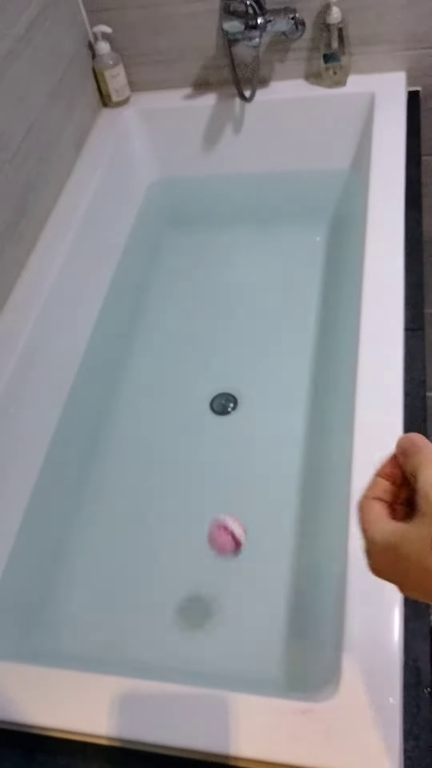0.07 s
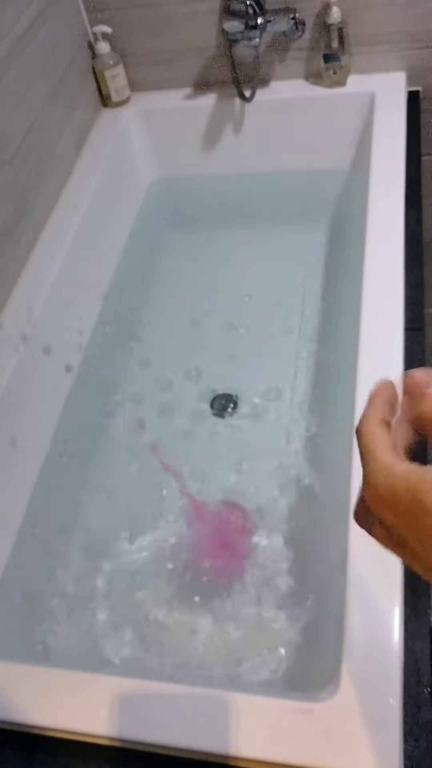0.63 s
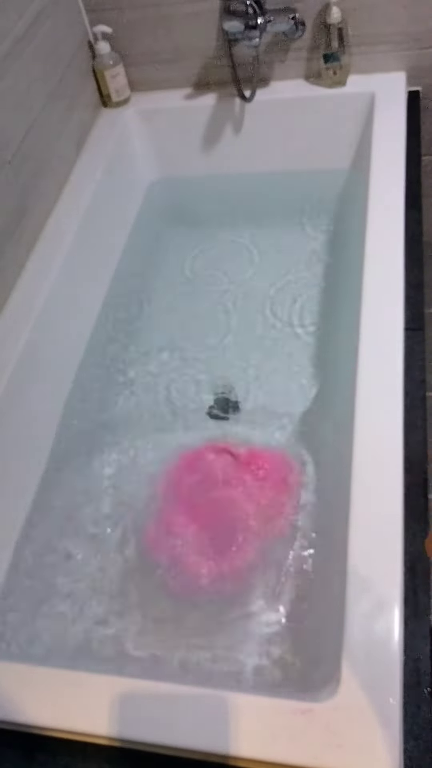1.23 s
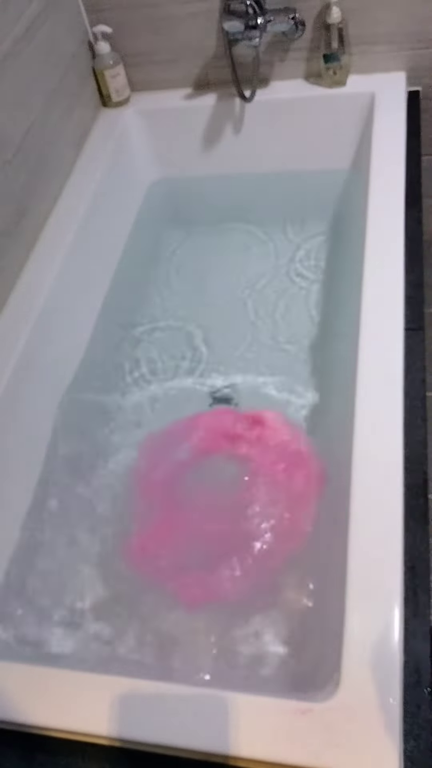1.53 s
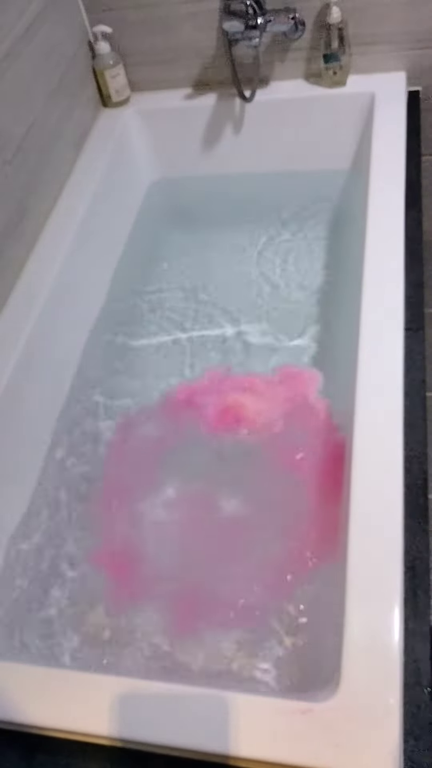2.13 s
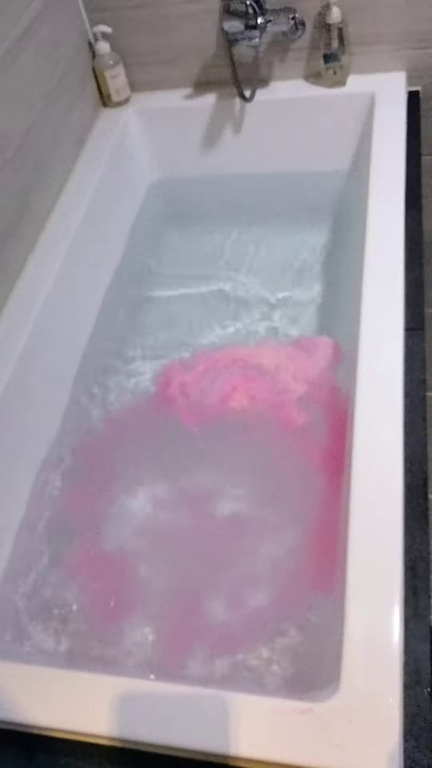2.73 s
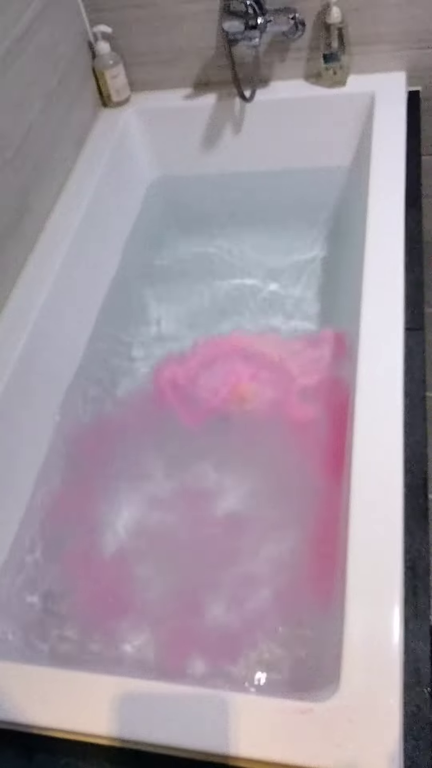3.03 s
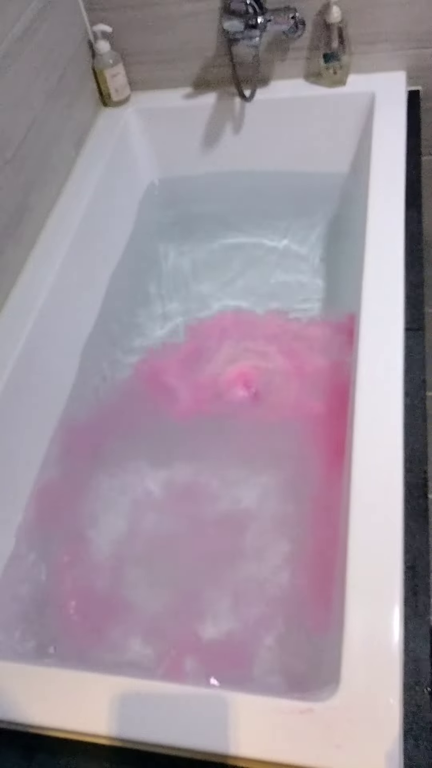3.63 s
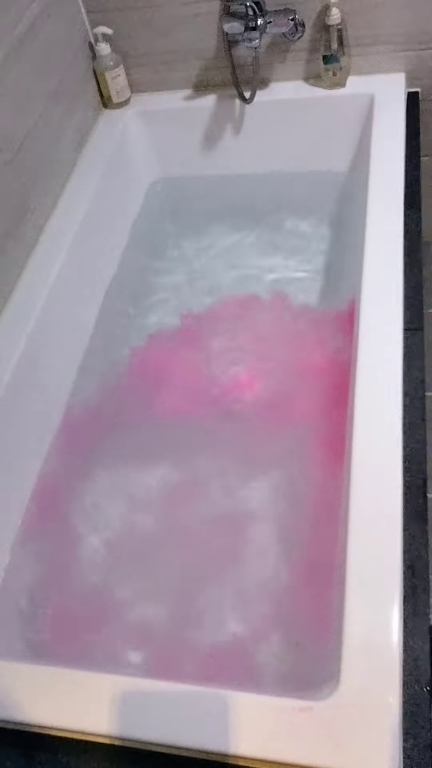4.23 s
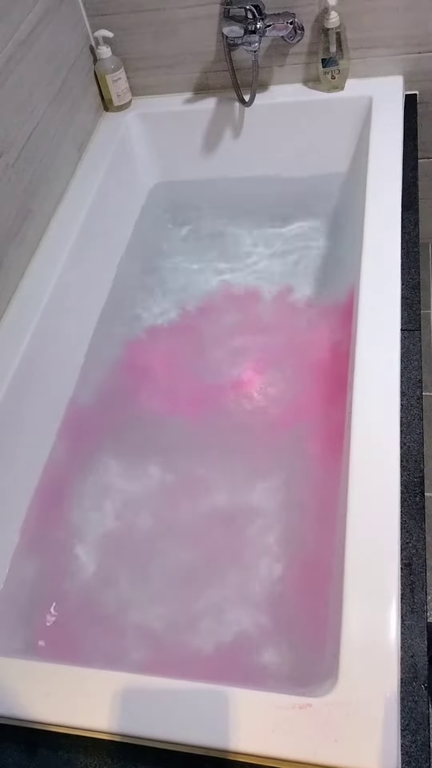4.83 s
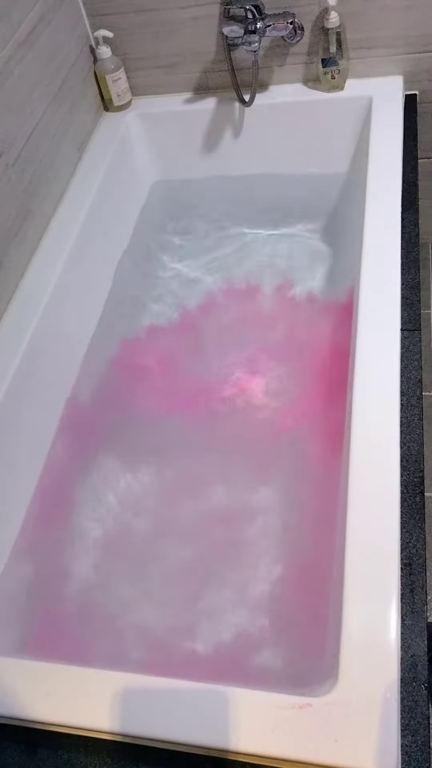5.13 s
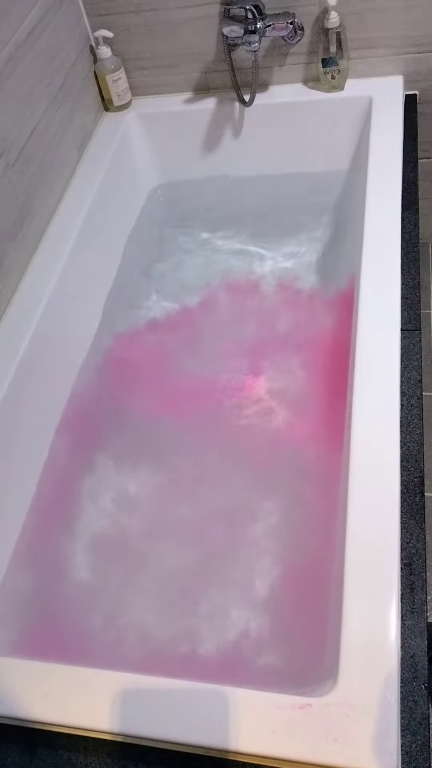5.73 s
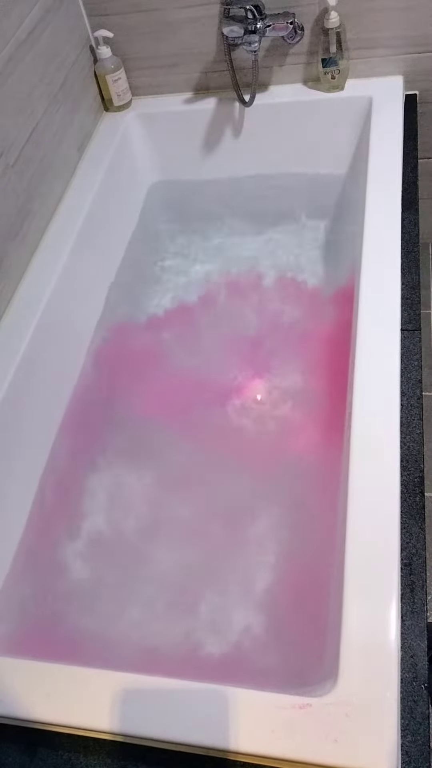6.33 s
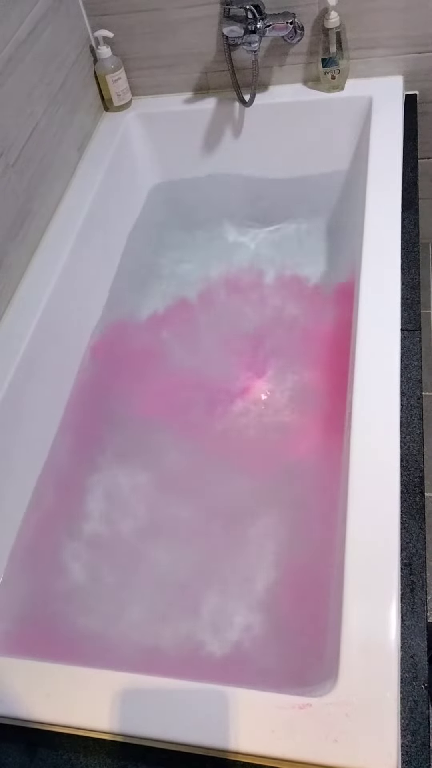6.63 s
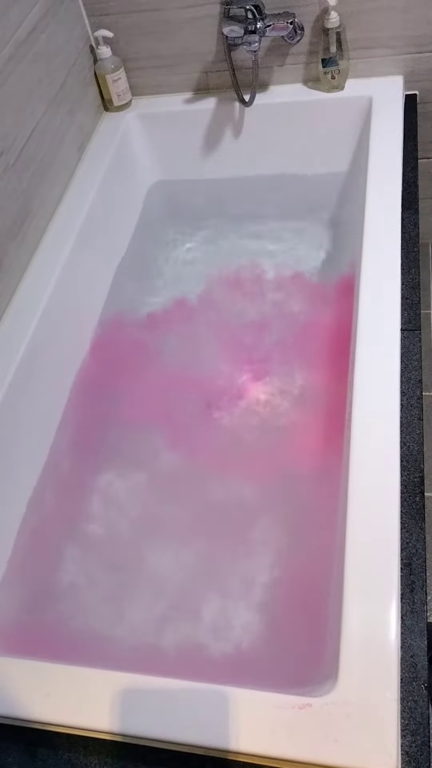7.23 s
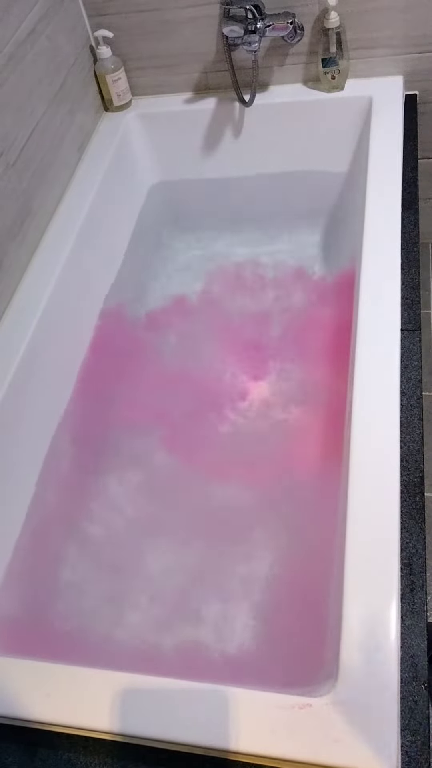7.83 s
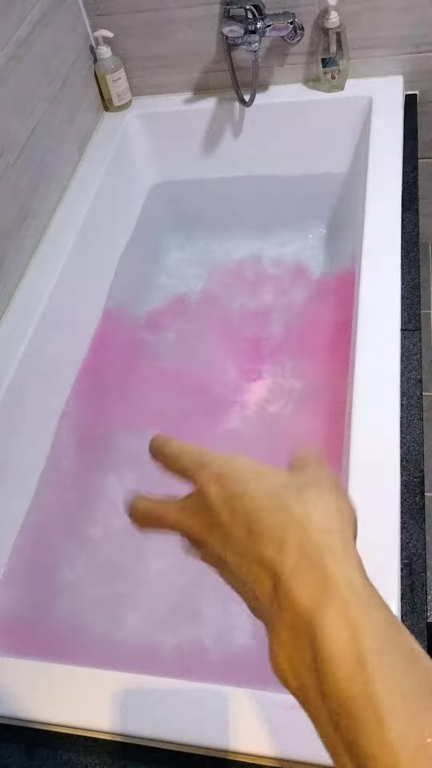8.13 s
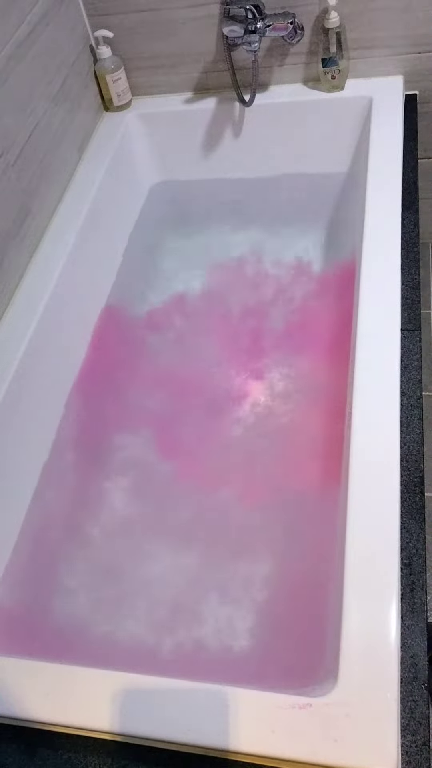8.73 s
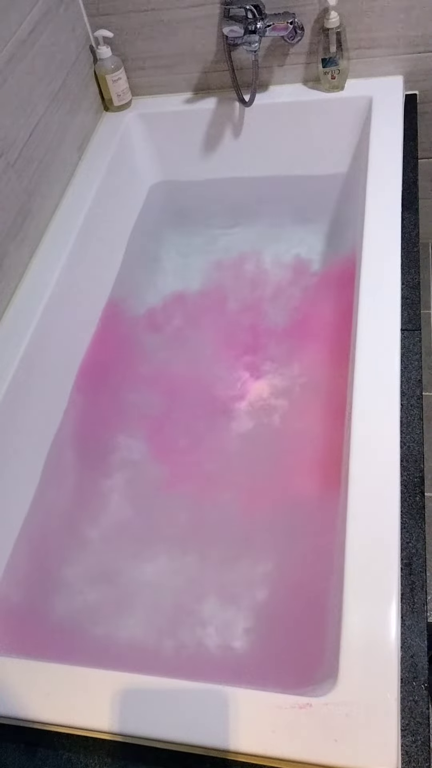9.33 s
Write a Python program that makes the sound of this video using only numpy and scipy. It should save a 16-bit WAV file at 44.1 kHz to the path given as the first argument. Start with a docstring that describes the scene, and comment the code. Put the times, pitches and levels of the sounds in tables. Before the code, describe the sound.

A bath bomb lightly slaps the water of a full tub at about 0.2 seconds, then at 0.3 seconds hits the bottom with a sharp knock, a hollow boom and deep gulps, by far the loudest moment. Around 0.7 to 1 second, thrown-up water falls back in a smaller, bubbly splash. Several bright drops plink close by between 1.2 and 2 seconds, with a short tiled-bathroom echo.

A soft fizz of countless tiny bubbles builds over the first second and a half. It is fuller and more crackly at first, thinning by about 3 seconds into a fine, high hiss that continues steadily to the end, at about 9.5 seconds. A ventilation fan hums faintly underneath throughout. Rocking water makes a few soft, low bumps near 3.8 seconds and after 8 seconds, and a faint tap comes from across the room at 9 seconds.

```python
"""A bath bomb drops into a full tub in a tiled bathroom: it slaps the water and knocks on the tub floor.
The air it dragged down gulps, the jet it threw up splashes back, and a few stray drops land close by.
Then countless tiny gas bubbles fizz as they burst at the surface.
Behind it all a ventilation fan hums, and near the end something taps faintly across the room."""
import sys
import numpy as np
from scipy import signal
from scipy.fft import rfft, irfft
from scipy.io import wavfile
from scipy.ndimage import map_coordinates

SR = 44100
rng = np.random.default_rng(int(sys.argv[2]) if len(sys.argv) > 2 else 0)


def master(y):
    """Save y as 16-bit WAV."""
    cut = np.clip(np.atleast_2d(y).T, -1, 1)
    pcm = np.round(cut * 32767)  # scale
    wavfile.write(sys.argv[1], SR, pcm.astype(np.int16))


N = 414099
TIME = np.arange(N) / SR
SLAP_AT_S, KNOCK_AT_S = 0.170, 0.279

# The ball hits the water, then the floor: level_db, fade_s (time to fall 60 dB), echo_db
WATER_SLAP = (-42, 0.089, -34.5)
FLOOR_KNOCK = (-11.5, 0.085, -11.5)
# Their tone, or how strong the low and high parts are: pitch_hz, gain_db
SLAP_TONE = [(40, -8), (110, 0), (200, -11), (320, -4), (550, -20), (850, -16), (1350, -25), (2500, -17),
             (5500, -22.5), (8000, -25), (15500, -26.5)]
KNOCK_TONE = [(40, -13), (100, -6), (300, 3.5), (560, -6.5), (780, -14.5), (1200, -16), (3000, -18.5),
              (6300, -27.5), (7500, -27), (15500, -29)]
# Broad pitch ranges that the tub's shell boosts or weakens: pitch_hz, width_hz, gain_db
SHELL_BANDS = [(1240, 390, 7), (1650, 200, 1), (1935, 150, 10), (2630, 240, 6.5), (3200, 250, -2.5),
               (3800, 340, 8.5), (4460, 570, -5.5), (5430, 920, 10.5)]
# Sharp cracks of the hits, their wall echoes and the falling jet: start_s, level_db, fade_s
SHARP_CRACKS = [(0.1701, -34, .008), (0.2803, -6.5, 0.0084), (0.2873, -13, 0.019), (0.2944, -20, 0.012),
                (0.3005, -20, 0.036), (0.7458, -24, 0.017)]
# Low notes of the full tub: pitch_hz, level_db, fade_s
TUB_NOTES = [(71.6, -34, 1.2), (111, -13.5, 0.66), (138, -22.5, 1.13), (161, -18, 0.79), (201, -26, 0.79),
             (231, -27, .55), (291.6, -22, 0.87), (333, -17.5, 0.58), (350, -34, 0.65), (432, -28, 1.2),
             (489, -30, 0.86), (529, -27.5, 0.88), (557.4, -21.5, 1.02), (666, -33, 1)]
def plunge(boom_rise_s=0.01):
    """The ball slaps the surface and knocks on the floor, which sets the tub booming."""
    out, t = np.zeros(N), TIME[:2 * SR]
    add(out, SLAP_AT_S, burst(WATER_SLAP, SLAP_TONE))
    add(out, KNOCK_AT_S, burst(FLOOR_KNOCK, KNOCK_TONE, SHELL_BANDS))
    crack_tone = [(200, -10), (1200, 4), (6000, -6), (8000, -12), (15500, -15)]  # pitch_hz, gain_db
    for start_s, level_db, fade_s in SHARP_CRACKS:
        crack = amp(level_db) * rng.standard_normal(len(t)) * decay(t, fade_s)
        add(out, start_s, shape_tone(crack, crack_tone, SHELL_BANDS))
    boom = sum(amp(level_db) * decay(t, fade_s) * np.sin(2 * np.pi * (pitch_hz * t + rng.random()))
               for pitch_hz, level_db, fade_s in TUB_NOTES)
    add(out, KNOCK_AT_S, boom * (1 - np.exp(-t / boom_rise_s)))
    return out


# How hard the ball gives off gas: time_s, level_db
GAS_FLOW = [(1.3, -44), (1.68, -43.5), (2.11, -46), (3.19, -42.5), (3.96, -46.5), (5.0, -43.5),
            (5.45, -44.5), (5.9, -45.5), (8.19, -46), (9.39, -45.5)]
# Tone of the large, medium and tiny bubbles: pitch_hz, gain_db
LARGE_TONE = [(900, -16.5), (1500, -12), (2000, -5), (2500, -0.5), (3200, 0.5), (4200, -0.5), (5200, -0.5),
              (7000, -31.5)]
MEDIUM_TONE = [(3500, -30), (4600, -8), (5500, 0), (6500, -1.5), (7200, -12), (9000, -35)]
TINY_TONE = [(4500, -44), (6900, -4), (7600, -1), (8600, 0.5), (10700, 0.5), (11700, -2), (13500, -1.5),
             (15200, -1), (15800, -4)]
def fizz(fresh_until_s=2.6, flutter_db=0.7):
    """Gas bubbles burst by the thousand; the large ones are loudest while the ball is fresh."""
    gas = level_curve(GAS_FLOW, rise_s=0.92, fall_s=1)
    fresh = np.exp(-(TIME / fresh_until_s) ** 3)
    large = shape_tone(crackle(per_s=1500, spread_db=0.5, hiss_db=1.5), LARGE_TONE)
    medium = shape_tone(crackle(per_s=2700, spread_db=-1.5, hiss_db=3.5), MEDIUM_TONE)
    tiny = shape_tone(crackle(per_s=6000, spread_db=1.5, hiss_db=2.5), TINY_TONE)
    out = amp(-8.5 + 9.8 * fresh) * large
    out += amp(-5.5 + fresh) * unit(gas) ** 0.2 * medium  # these swell most with the gas
    out += amp(-1 - 0.5 * fresh) * tiny
    in_water = TIME > SLAP_AT_S
    return in_water * gas * out * amp(flutter_db * drift(rate_hz=12))


# Air pockets closing, and soft bumps of rocking water: start_s, level_db, pitch_hz, fade_s
AIR_POCKETS = [(0.197, -27, 150, 0.053), (0.2874, 2.5, 174, 0.03), (0.3121, -3, 143.4, 0.091),
               (0.347, -12, 253, 0.028), (0.3821, 4.5, 137, 0.033), (0.639, -29.5, 149, 0.12),
               (0.7061, -27, 1300, .06), (.744, -15, 288, 0.052), (0.776, -23.5, 170, 0.076),
               (.822, -19.5, 675, 0.071), (3.77, -44, 106, 0.26), (8.273, -32, 175, 0.034),
               (8.789, -45, 106, 0.24), (9.268, -43, 191, 0.13)]
def gulps():
    """Large pockets of air pinch off and ring briefly."""
    out = np.zeros(N)
    for start_s, level_db, pitch_hz, fade_s in AIR_POCKETS:
        add(out, start_s, amp(level_db) * bubble(pitch_hz, fade_s, rise=0.21))
    return room(out, echo_db=-5)


# Tone of the sloshing and of the spray: pitch_hz, gain_db
SLOSH_TONE = [(35, -18), (70, 3), (110, 5), (170, -19), (300, 3.5), (500, -1), (700, 4), (1000, -10),
              (1800, -27)]
SPRAY_TONE = [(1000, -14), (2500, 8.5), (4500, -3.5), (6200, 1.5), (7500, -7.5), (10500, -6.5),
              (13000, -13.5), (15500, -11)]
# The hole in the water closes, then the jet comes down from foot to tip:
# start_s, hold_s, slosh_db, bubbles_db, spray_db, pitch_hz, scatter_octaves
FALLING_WATER = [(0.411, 0.089, -38, -33.5, -36.5, 2155, .12), (0.7, 0.042, -37.5, -29, -38.5, 1283, .5),
                 (.742, 0.09, -33.5, -31.5, -33, 1320, 0.76), (.835, 0.08, -41, -31, -30.5, 2200, 0.38),
                 (.972, 0.042, -49, -35.5, -29, 2270, 0.26)]
def splash(slosh_gain_db=1, bubbles_gain_db=-3, spray_gain_db=1):
    """Falling water heaves the surface, traps bubbles and scatters spray."""
    slosh, bubbles, spray = np.zeros((3, N))
    for start_s, hold_s, slosh_db, bubbles_db, spray_db, pitch_hz, scatter_octaves in FALLING_WATER:
        heave = surge(hold_s, fade_db_per_s=100) * rng.standard_normal(SR)
        cloud = surge(hold_s, fade_db_per_s=61) * bubble_cloud(pitch_hz, scatter_octaves)
        patter = surge(hold_s, fade_db_per_s=104) * crackle(per_s=1500, spread_db=2.5, hiss_db=0)[:SR]
        add(slosh, start_s, amp(slosh_db + slosh_gain_db) * heave)
        add(bubbles, start_s, amp(bubbles_db + bubbles_gain_db) * cloud)
        add(spray, start_s, amp(spray_db + spray_gain_db) * patter)
    slosh = shape_tone(slosh, SLOSH_TONE + [(6000, -70)])
    return slosh + room(bubbles, echo_db=-3) + shape_tone(spray, SPRAY_TONE)


# Drops landing: start_s, level_db, pitch_hz, splat_db (next to the ping), ping_fade_s
STRAY_DROPS = [(1.2305, -25.5, 5300, 2, 0.0048), (1.2893, -25, 2820, 8, 0.0045),
               (1.3378, -31, 3280, 6, 0.0071), (1.3852, -23.5, 3200, 1, .007),
               (1.4911, -15.5, 2660, -3, 0.0043), (1.626, -19.5, 2560, -15, 0.0069),
               (1.7863, -25, 2530, -12, 0.0097), (1.8027, -10.5, 2750, 1, 0.0058),
               (1.974, -29, 2360, -15, 0.0091)]
def drops(splat_fade_s=0.0088):
    """Each drop lands close by with a short bright splat and a bubble's ping."""
    out, t = np.zeros(N), TIME[:1024]
    low_cut = signal.butter(2, 1750, "high", fs=SR, output="sos")  # drops are too small for low notes
    splat_tone = [(1300, -5), (2500, -1), (6000, -5.5), (11000, -3.5), (15000, -8)]  # pitch_hz, gain_db
    for start_s, level_db, pitch_hz, splat_db, ping_fade_s in STRAY_DROPS:
        splat = amp(splat_db) * rng.standard_normal(len(t)) * decay(t, splat_fade_s) / 2
        drop = shape_tone(splat, splat_tone)
        add(drop, 0, bubble(pitch_hz, ping_fade_s, rise=0.072))
        add(out, start_s, amp(level_db) * room(signal.sosfilt(low_cut, drop), echo_db=-9))
    return out


# A tap across the room: level_db, fade_s, echo_db
FAR_TAP = (-42, 0.05, -53)
# Its tone: pitch_hz, gain_db
TAP_TONE = [(700, -18), (1200, -9), (1650, -4), (2100, -5), (2800, -3), (3500, -12), (8000, -24)]
def tap(start_s=9.014):
    """Something far off taps faintly, and the room echoes it."""
    out = np.zeros(N)
    add(out, start_s, burst(FAR_TAP, TAP_TONE))
    return out


# Tone of the fan's rushing air, with a faint background hiss on top: pitch_hz, gain_db
AIR_AND_HISS = [(30, -13.5), (55, -14), (70, -17), (85, -19.5), (112, -4), (152, -12), (188, 0.5),
                (260, -2.5), (440, -10), (690, -9.5), (1000, -19.5), (1500, -28.5), (3000, -27),
                (6000, -43), (15000, -38)]
# The motor's notes: pitch_hz, level_db
MOTOR_NOTES = [(71, -68), (177, -62), (196, -65.5), (240, -70), (410, -65.5), (721, -66.5), (922, -72)]
# Moments when its whine grows louder: peak_s, half_length_s, gain_db
WHINE_RISES = [(2.45, 0.36, 5), (9.3, 0.77, 8)]
def fan(air_db=-49, gust_db=1.03, whine_hz=495, whine_db=-63):
    """The fan pushes dull, slightly uneven air while its motor hums and whines."""
    rush = amp(air_db + gust_db * drift(rate_hz=10)) * shape_tone(rng.standard_normal(N), AIR_AND_HISS)
    motor = sum(amp(level_db) * hum(pitch_hz, waver_radians=1.6) for pitch_hz, level_db in MOTOR_NOTES)
    swell_db = sum(gain_db * np.exp(-((TIME - peak_s) / half_length_s) ** 2)
                   for peak_s, half_length_s, gain_db in WHINE_RISES)
    return rush + motor + amp(whine_db + swell_db) * hum(whine_hz, waver_radians=0.52)


# How long the tiled room rings: pitch_hz, fade_s
ROOM_FADES = [(80, 0.42), (210, 0.56), (560, 1), (1500, 0.86), (3900, 0.98), (10000, 0.59)]
def echoes(rise_s=0.0028):
    """Sound bounces off the tiles and blurs into a tail, each pitch fading at its own speed."""
    hz, t, spectrum = signal.stft(rng.standard_normal(SR), SR, nperseg=512)
    spectrum = spectrum * decay(t, at_pitch(ROOM_FADES, hz)[:, None])
    tail = signal.istft(spectrum, SR, nperseg=512)[1][:SR]
    return tail * (1 - np.exp(-(TIME[:SR] / rise_s) ** 2))


def room(sound, echo_db):
    """A sound arrives directly, followed by its echoes."""
    tail = echoes()
    response = amp(echo_db) * tail / np.linalg.norm(tail)
    response[0] += 1
    return signal.oaconvolve(sound, response)[:N]


def burst(hit, tone, bands=()):
    """A hit makes a sudden, quickly dying rush of noise, and the room answers."""
    level_db, fade_s, echo_db = hit
    direct = amp(level_db) * rng.standard_normal(SR) * decay(TIME[:SR], fade_s)
    return shape_tone(direct + amp(echo_db) * echoes(rise_s=0.0044), tone, bands)


def crackle(per_s, spread_db, hiss_db):
    """Random pops of uneven size; their countless echoes blur into a smooth hiss."""
    sizes = amp(spread_db * np.minimum(rng.exponential(1, N), 5))
    pops = sizes * rng.choice([-1, 1], N) * (rng.random(N) < per_s / SR)
    return unit(unit(pops) + amp(hiss_db) * rng.standard_normal(N))


def bubble(pitch_hz, fade_s, rise):
    """An air bubble rings and climbs in pitch as it nears the surface."""
    t = np.arange(0, fade_s, 1 / SR)
    cycles = pitch_hz * (t + rise * t ** 2 / (2 * fade_s))
    onset = 1 - np.exp(-(2 * cycles) ** 2)
    return -np.sin(2 * np.pi * cycles) * decay(t, fade_s) * onset


def bubble_cloud(centre_hz, scatter_octaves, density=1100, ring_cycles=36, spread_db=3, pitches=48):
    """One second of small bubbles ringing around one pitch."""
    cloud = np.zeros(SR)
    for hz in np.geomspace(600, 5000, pitches):
        share = np.exp(-(np.log2(hz / centre_hz) / scatter_octaves) ** 2 / 2) / scatter_octaves
        born = rng.random(SR) < 2 * share * density / pitches / SR
        strength = amp(spread_db * np.minimum(rng.exponential(1, SR), 3)) * rng.choice([-1, 1], SR)
        ring = bubble(hz, ring_cycles / hz, rise=0.069)
        cloud += signal.oaconvolve(born * strength, ring)[:SR] * np.sqrt(hz)
    return unit(cloud)


def hum(pitch_hz, waver_radians, flutter_db=2.0):
    """A motor note whose strength and pitch wander a little."""
    strength = amp(flutter_db * drift(rate_hz=6.5))
    return unit(strength * np.sin(2 * np.pi * pitch_hz * TIME + waver_radians * drift(rate_hz=8)))


def surge(hold_s, fade_db_per_s, rise_s=0.0088):
    """One second of loudness: it jumps up, holds while the water lands, then fades."""
    t = TIME[:SR]
    return np.minimum(t / rise_s, 1) * amp(-fade_db_per_s * np.maximum(t - hold_s, 0))


def level_curve(rows, rise_s, fall_s):
    """Loudness over time, fading in before the first row and out after the last."""
    time_s, level_db = np.transpose(rows)
    before, after = np.maximum(time_s[0] - TIME, 0), np.maximum(TIME - time_s[-1], 0)
    return np.exp(-before / rise_s - after / fall_s) * amp(np.interp(TIME, time_s, level_db))


def shape_tone(sound, tone, bands=()):
    """Turns some pitches up and others down; white noise keeps its overall level."""
    hz = np.fft.rfftfreq(8192, 1 / SR)
    bands_db = sum(gain_db / (1 + (2 * (hz - pitch_hz) / width_hz) ** 2)
                   for pitch_hz, width_hz, gain_db in bands)
    log_gain = np.log(unit(amp(at_pitch(tone, hz) + bands_db)))
    # Build the filter so that nothing rings before the sound starts.
    spectrum = np.exp(signal.hilbert(np.r_[log_gain, log_gain[-2:0:-1]]).conj())
    response = np.fft.ifft(spectrum).real
    return signal.oaconvolve(sound, response[:4096])[:len(sound)]


def at_pitch(rows, hz):
    """Looks up a table at any pitch, sliding smoothly between its rows."""
    pitch_hz, value = np.transpose(rows)
    return np.interp(np.log(hz + 1), np.log(pitch_hz + 1), value)


def decay(t, fade_s):
    """Dies away, 60 dB down after fade_s."""
    return np.exp(-np.log(1000) * t / fade_s)


def drift(rate_hz):
    """A slow random wander, about 1 in size."""
    points = rng.standard_normal(N // 100)
    return unit(map_coordinates(points, [TIME * rate_hz], order=1, mode="wrap"))


def add(mix, start_s, sound):
    """Adds a sound to the mix at start_s."""
    part = mix[max(round(start_s * SR), 0):][:len(sound)]
    part += sound[:len(part)]


def amp(db):
    """Turns decibels into a multiplier."""
    return 10 ** (np.asarray(db) / 20)


def unit(x):
    """Scales to an average (rms) level of 1."""
    return x / np.sqrt(np.mean(x ** 2) + 1e-20)


# How much left and right differ, next to what they share: pitch_hz, side_db
STEREO_WIDTH = [(60, -61), (500, -70), (1600, -64), (2800, -47), (5000, -21.5), (9000, -21.5),
                (14000, -17.5)]
def scene(scatter_samples=256):
    """Everything lies straight ahead; a faint scattered copy of the mix makes left and right differ slightly,
    mostly in the highs."""
    middle = plunge() + gulps() + splash() + drops() + tap() + fizz() + fan()
    scatter = irfft(np.exp(2j * np.pi * rng.random(scatter_samples // 2 + 1)))
    scattered = signal.oaconvolve(middle, scatter)[:N]
    side_db = at_pitch(STEREO_WIDTH, np.fft.rfftfreq(N, 1 / SR))
    side = irfft(rfft(scattered) * amp(side_db), N)
    return np.array([middle + side, middle - side])


def record(dry):
    """Rounds off the loudest peaks, then removes the very highest pitches."""
    top_hz = 15850
    rounded = dry / (1 + dry ** 4) ** (1 / 4)
    high_cut = signal.firwin(511, top_hz, window=("kaiser", 9), fs=SR)
    return signal.oaconvolve(rounded, high_cut[None], "same")


dry = scene()
out = record(dry)
master(out)
```